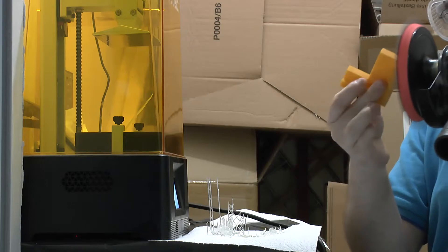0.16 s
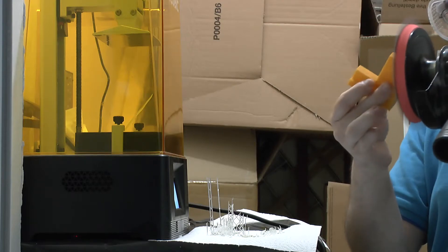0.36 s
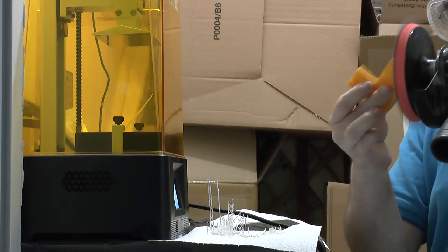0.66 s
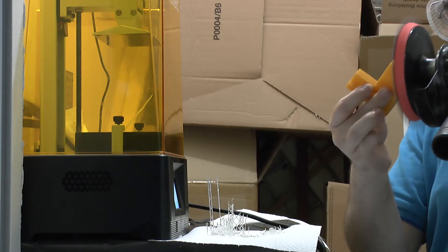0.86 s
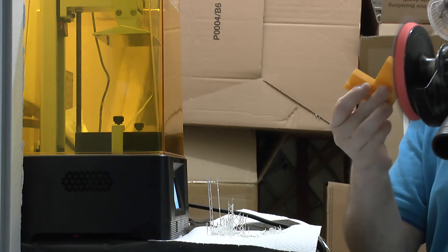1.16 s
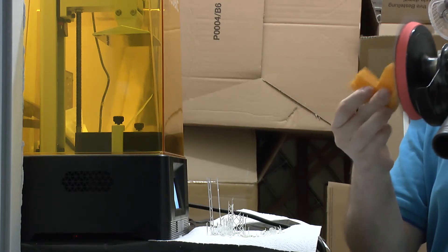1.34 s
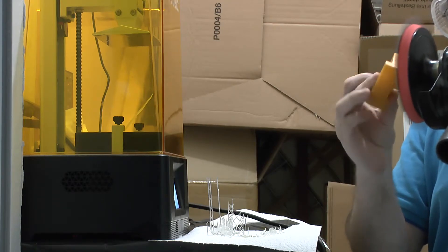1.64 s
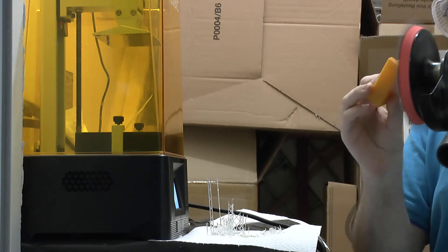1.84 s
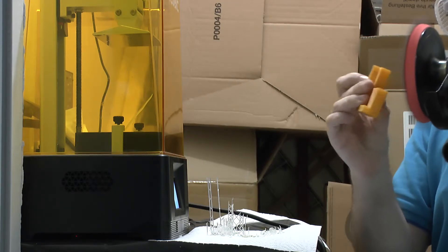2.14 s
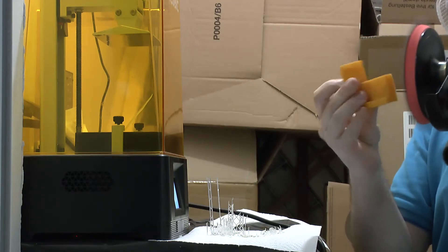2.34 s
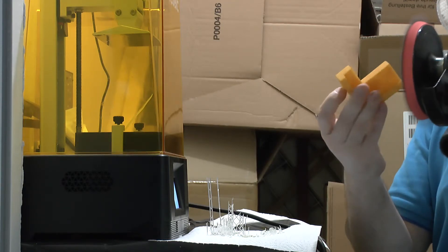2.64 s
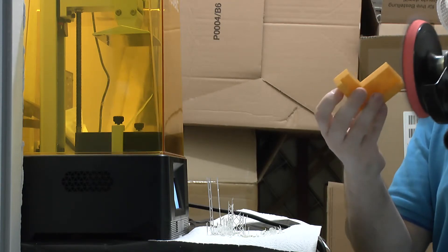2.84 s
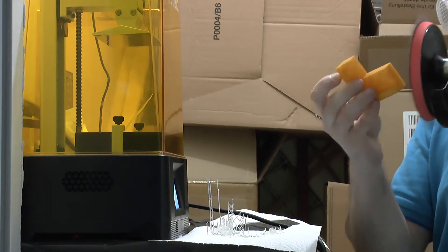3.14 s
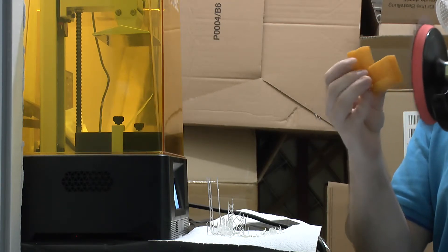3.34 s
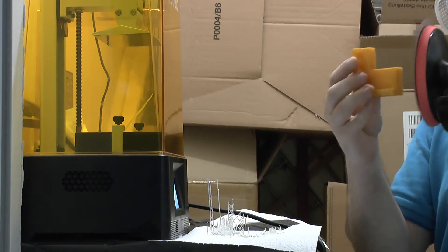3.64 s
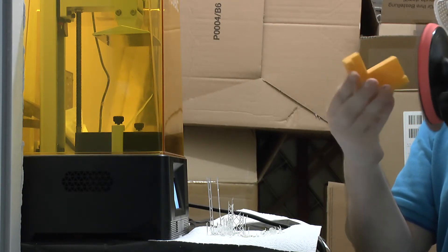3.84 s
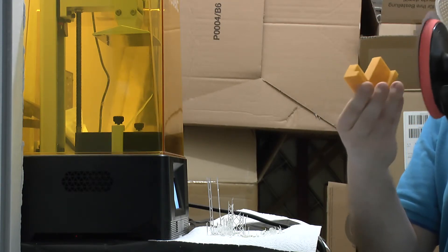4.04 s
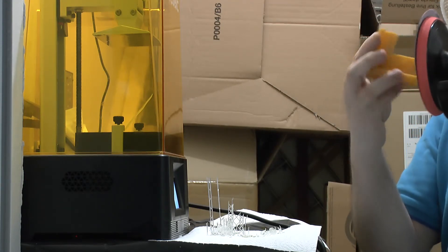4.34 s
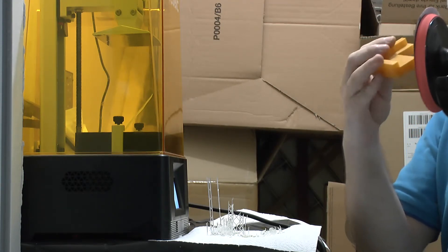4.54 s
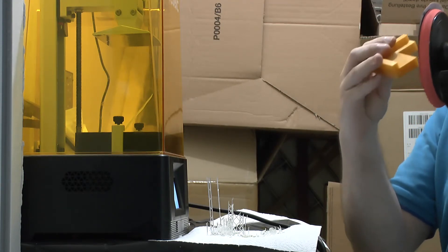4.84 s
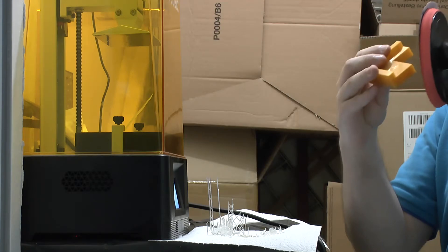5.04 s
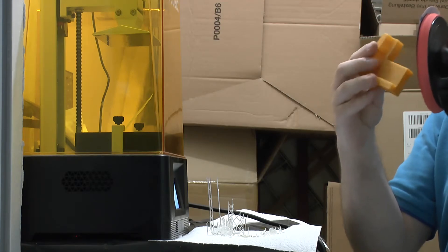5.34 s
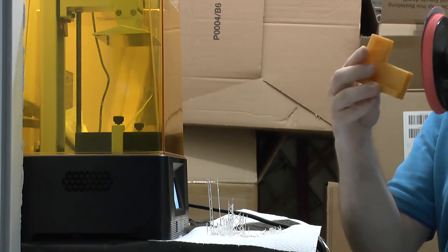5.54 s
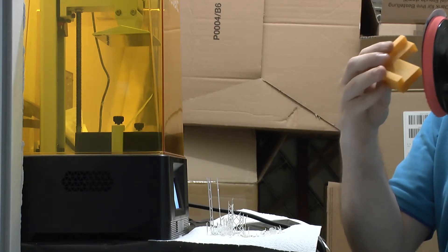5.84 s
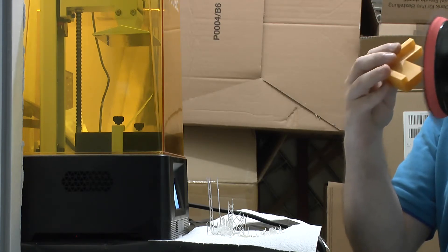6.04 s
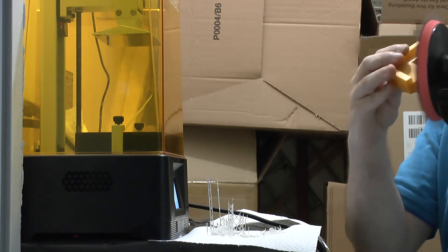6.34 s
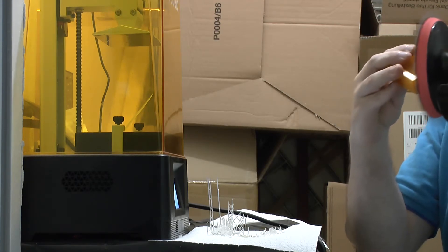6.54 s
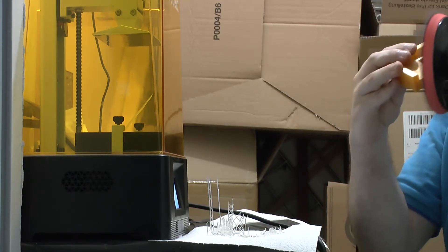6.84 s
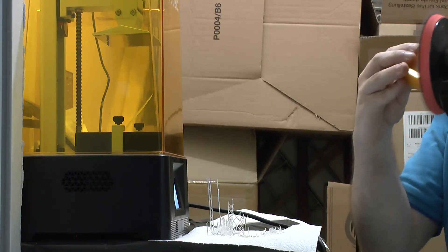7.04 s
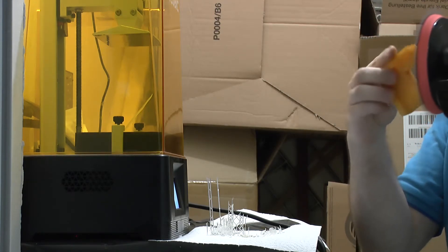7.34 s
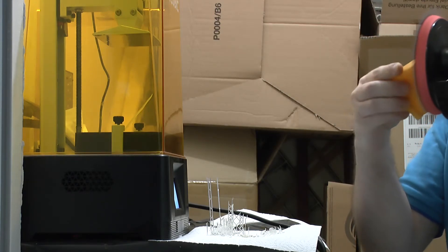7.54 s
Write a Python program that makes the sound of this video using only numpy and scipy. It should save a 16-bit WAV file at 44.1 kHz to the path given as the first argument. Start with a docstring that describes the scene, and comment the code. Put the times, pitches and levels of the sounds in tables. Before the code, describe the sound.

Close harsh motor whir with brief gritty rubs, a clattering coast-down to near silence, a lock snap, then a sudden rattling restart in a workshop.

```python
"""In a small workshop a mains grinder with a sanding pad runs close by; a plastic part brushes the pad.
Loose gears rattle in the resonant housing over noise (whirr) and armature harmonics (whine) of the motor.
It is switched off, coasts with ever sparser knocks and a snap, creeps to rest with faint friction; a lock snaps.
After a silence the switch clicks and it jerks up to speed. Resonators driven by noise, clicks and tones
make the whirr, rattle, knocks and snaps; sines make the hum, buzz, rotation tones and squeaks."""
import sys
import numpy as np
from scipy import signal
from scipy.io import wavfile

SR = 44100
rng = np.random.default_rng(int(sys.argv[2]) if len(sys.argv) > 2 else 0)


def log_audio(samples):
    """Write samples as a 16-bit WAV file to the path given in sys.argv[1]."""
    # one column per channel
    frames = np.atleast_2d(samples).T
    # limit to full scale, then quantise
    limited = np.clip(frames, -1, 1)
    pcm = np.round(limited * 32767).astype(np.int16)
    wavfile.write(sys.argv[1], SR, pcm)


N = 338688
T = np.arange(N) / SR
POWER_OFF_S, POWER_ON_S = 2.63, 5.914
GEAR_RATIO = 3.27      # armature turns for one turn of the pad
MAINS_BEAT_HZ = 100    # current peaks per second
CUTOFF_HZ = 16600      # upper limit of the sound


def from_db(db):
    """Level law: amplitude is ten to the power of dB / 20."""
    return 10 ** (np.asarray(db) / 20)


def rms_one(x):
    """Normalization: divides by the root mean square."""
    return x / np.sqrt(np.mean(x ** 2) + 1e-20)


def in_time(rows, outside=-150):
    """Linear interpolation: columns become straight lines in time, with `outside` beyond the table."""
    s, *columns = np.transpose(rows)
    return np.array([np.interp(T, s, c, left=outside, right=outside) for c in columns])


def drift(rate):
    """Low-pass random process: slow chance of spread 1, with its corner at rate in Hz."""
    r = np.exp(-2 * np.pi * rate / SR)
    slow = signal.lfilter([1], [1, -2 * r, r * r], rng.standard_normal(N + 20000))
    return rms_one(slow[20000:])


def resonances(x, modes):
    """Modal superposition: parallel (Hz, width in Hz, dB) resonances with alternating signs."""
    out = 0
    for k, (hz, width_hz, level_db) in enumerate(modes):
        r = np.exp(-np.pi * width_hz / SR)
        poles = [1, -2 * r * np.cos(2 * np.pi * hz / SR), r * r]
        zeros = [(1 - r * r) / 2, 0, (r * r - 1) / 2]
        out = out + (-1) ** k * from_db(level_db) * signal.lfilter(zeros, poles, x)
    return out


def dying(clicks, t60, rise=0.00071):
    """Exponential decay: each click starts an envelope that swells briefly and dies away (seconds)."""
    r = np.exp(-1 / (rise * SR))
    decay = signal.lfilter([1], [1, -from_db(-60 / (t60 * SR))], clicks + 1e-18)
    return signal.lfilter([1 - r], [1, -r], decay)


def once_a_cycle(phase):
    """Phase counting: marks the sample at which a jittery phase completes each cycle."""
    return np.diff(np.floor(np.maximum.accumulate(phase) / (2 * np.pi)), prepend=0) > 0


# Whirr of housing, gear case, and fan with brushes. Each row: level in dB at full speed,
# dB lost when power is cut, dB lost per halving of speed.
WHIRR = [(-19.5, 6, 8), (-21, 5, 6), (-30, -1, 9)]
# The whirr jerks, falters and catches. Each row: time in seconds, level in dB over running level.
START_UP = [(5.914, 1), (5.97, -2.5), (5.99, 1), (6.008, -3.5), (6.05, -5.5), (6.076, 2), (6.16, 3.5),
            (6.3, 3)]


def whirr_db(speed):
    """Speed law of noise: steady under power, sinking with each halving of speed while coasting."""
    halvings = np.log2(150 / np.clip(speed, .01, 150))
    start_db = np.interp(T, *np.transpose(START_UP)) * (T > POWER_ON_S)
    coasting = (T >= POWER_OFF_S) & (T <= POWER_ON_S)
    return np.array([full_db + start_db - coasting * (cut_db + halving_db * halvings)
                     for full_db, cut_db, halving_db in WHIRR])


def rattle(turns, powered):
    """Backlash: teeth knock at each current peak and about once a turn, harder at one angle of the pad."""
    by_current = powered * once_a_cycle(2 * np.pi * MAINS_BEAT_HZ * T + 1.1 * drift(40))
    by_turn = once_a_cycle(turns + .9 * drift(60))
    pad_db = 2.5 * np.cos(turns / GEAR_RATIO + 1.4 * drift(6.5))
    sizes = from_db(pad_db + np.clip(rng.normal(0, 2.5, N), -9, 4))
    return rms_one(dying((by_current + .4 * by_turn) * sizes, t60=.011, rise=.001))


# Harmonics of the bar rate. Each row: multiple of the bar rate, relative level in dB under power,
# relative level in dB coasting.
BAR_TONES = [(1, -3, 0), (2, -2, 1), (3, 4, -1), (4, 3, -2), (5, 0, -2), (6, 0, -3), (7, -2, -3),
             (8, -3, -4), (9, -5, -5), (10, -6, -6)]
BARS = 24
COASTING_FLICKER_DB = 2   # spread of the flicker with the power off


def commutator_whine(speed, turns, powered, surge):
    """Harmonic series: brushes tick over the bars; uneven bars add side lines one order apart."""
    uneven = 1 + 0.4 * np.cos(turns + 3 * drift(7.0))
    waver = turns + 0.0067 * drift(46)
    tones = 0
    for multiple, tone_db, coasting_db in BAR_TONES:
        level_db = np.where(powered, tone_db, coasting_db + 3.1 * drift(12)) + 1.6 * drift(2.7)
        audible = multiple * BARS * speed < CUTOFF_HZ
        tones = tones + from_db(level_db) * np.cos(round(multiple) * BARS * waver) * audible
    fade = np.clip(speed / 48, 0, 1) ** 2 * (1 - surge) ** 4
    return uneven * tones * fade * from_db(COASTING_FLICKER_DB * drift(30) * ~powered)


# Steady orders of the armature. Each row: multiple of the turning rate, level in dB under power at full speed.
ORDERS = [(1, -48), (2, -44), (8, -71.5), (11, -30.5), (12, -29), (14, -33.5), (16, -36), (28, -52.5),
          (32, -56)]
COASTING_ORDERS_DB = -6   # the orders weaken once the field is off
PAD_DB = -38              # the wobble of the pad is a low tone


def rotation_tones(speed, turns, powered):
    """Unbalance: forces locked to the rotation grow steeply with speed."""
    fast = np.sqrt(2) * (speed / 150) ** 2.1
    out = 0
    for multiple, level_db in ORDERS:
        level_db = level_db + COASTING_ORDERS_DB * ~powered + 2.1 * drift(29)
        out = out + fast * from_db(level_db) * np.sin(round(multiple) * turns + 1.0 * drift(7.7))
    return out + fast * (speed / 150) ** 2.5 * from_db(PAD_DB) * np.sin(turns / GEAR_RATIO)


# Buzz of the windings. Each row: multiple of the current beat, level in dB at full speed.
BUZZ_LINES = [(1, -57), (2, -53.5), (3, -51.5), (5, -45)]
SURGE_DB = 7   # rise of the buzz at full starting current


def winding_buzz(powered, surge):
    """Magnetic excitation: harmonics of the current beat, louder with the starting current."""
    out = 0
    for multiple, level_db in BUZZ_LINES:
        level = powered * from_db(level_db + SURGE_DB * surge + 2.6 * drift(24))
        out = out + np.sqrt(2) * level * np.sin(2 * np.pi * round(multiple) * MAINS_BEAT_HZ * T)
    return out


# Armature speed. Each row: time in seconds, speed in turns per second.
SPEED = [(0, 150.2), (2.63, 150.2), (2.82, 131), (2.98, 114), (3.14, 98), (3.38, 75.5), (3.54, 61.5),
         (3.7, 49.5), (3.9, 37), (4.2, 20), (4.4, 8), (4.45, .01), (5.91, .01), (6.05, 70), (6.2, 130),
         (6.3, 150.8), (7.68, 150.2)]
# Modes of the housing, of the gear case, and of the vents and guard, then the hollow body of the knocks,
# fuller when slow. Each row: frequency in Hz, width in Hz, relative level in dB.
HOUSING = [(334, 380, -13), (622.6, 137, 0.5), (898.4, 290, -8), (1212, 180, -6), (1740, 113, 6),
           (2054, 300, 2.5), (2582, 410, -9)]
GEAR_CASE = [(3200, 322, -1.5), (3690, 160, -1), (4230, 180, -1), (4717, 220, -1.5), (5224, 199, 1.5),
             (5970, 210, -3)]
TREBLE = [(6970, 1100, 2), (9140, 650, 4), (10050, 3200, -5.5), (13170, 1500, -10), (14300, 1300, -15)]
KNOCK_BODY = [(584, 110, -10), (877, 169, -4)]
# Slow knocks reach housing, gear case and vents less: dB per halving of speed.
KNOCK_DULLING_DB = (0.5, 2.5, 5)
RATTLE_DB, COASTING_RATTLE_DB = 8, 2    # random rattle over the whirr, with power on and off
COASTING_WHINE_DB = (2, 2, -1)          # change of the whine with the power off; same three parts
GROWL_DB = -12.5                        # growl of the housing with the starting current
BODY_DB, BODY_HALVING_DB = 14, 1.5      # slow knocks have more body: dB, dB gained per halving of speed
KNOCK_COLOUR_DB = 1.8                   # each knock favours another part of the casing
KNOCK_T60_S = .025


def motor():
    """Forced vibration: whirr, rattle, knocks and commutator whine sound through the same housing."""
    speed, = in_time(SPEED)
    turns = 2 * np.pi * np.cumsum(speed) / SR   # angle in radians
    powered = (T < POWER_OFF_S) | (T > POWER_ON_S)
    mains = powered * np.cos(2 * np.pi * MAINS_BEAT_HZ * T)
    surge = powered * np.clip(1 - speed / 150, 0, 1)   # a slow armature draws a heavy current
    halvings = np.log2(150 / np.clip(speed, 8, 150))
    levels_db = whirr_db(speed)
    rattle_db = np.where(powered, RATTLE_DB, COASTING_RATTLE_DB)
    white = rng.standard_normal(N)
    chatter = rattle(turns, powered)
    whine = commutator_whine(speed, turns, powered, surge)

    knock_shapes = dying(knock_clicks(speed, turns, powered), t60=KNOCK_T60_S, rise=0.00082)
    knocks = from_db(-5.0) * knock_shapes * rng.standard_normal(N)
    growl_db = GROWL_DB + 8.5 * mains + levels_db[0] - WHIRR[0][0]
    growl = from_db(growl_db) * np.sqrt(surge) * white
    full_knocks = knocks * from_db(BODY_HALVING_DB * halvings)
    out = resonances(full_knocks + growl, KNOCK_BODY) * from_db(BODY_DB)

    # shares of rattle, whine and knocks in housing, gear case and vents, in dB
    parts = zip((HOUSING, GEAR_CASE, TREBLE), levels_db, (2, 6, -4), (-12, -18, -13), (-1, -2, -20),
                COASTING_WHINE_DB, KNOCK_DULLING_DB)
    for modes, level_db, grip_db, whine_db, knock_db, coast_db, dull_db in parts:
        grip = from_db(rattle_db + grip_db)
        shake = white * (1 + grip * chatter) / (1 + grip)
        duller_db = -dull_db * halvings * ~powered + KNOCK_COLOUR_DB * drift(25)
        drive = from_db(level_db) * (shake + from_db(whine_db + coast_db * ~powered) * whine)
        drive += from_db(knock_db + duller_db) * knocks
        out += resonances(drive, modes) / resonances(white, modes).std()
    out += rotation_tones(speed, turns, powered) + winding_buzz(powered, surge)
    return out, turns


# The low hum wavers. Each row: time in seconds, level in dB.
HUM = [(3.0, -60), (3.5, -61), (3.76, -80), (3.95, -64), (4.57, -67), (4.66, -58), (5.13, -70), (5.25, -68),
       (5.67, -79.5), (6.15, -48.5)]
# Each row: frequency in Hz, relative level in dB.
HUM_LINES = [(30, 1), (50, 0.5)]
FLOOR_DB = -77


def background():
    """Tones over noise: two low hum lines over a faint low-pass rumble."""
    level_db, = in_time(HUM)
    hum = sum(from_db(line_db + 1.9 * drift(3.5)) * np.sin(2 * np.pi * hz * T) for hz, line_db in HUM_LINES)
    rumble = signal.lfilter([1], [1, -1.97, .9702], rng.standard_normal(N))
    return from_db(level_db) * hum + from_db(FLOOR_DB) * rms_one(rumble)


# The part brushing the pad. Each row: start in seconds, length in seconds, rise in seconds, level in dB.
TOUCHES = [(0.077, 0.011, 0.0045, -37), (0.427, 0.0044, .003, -14), (0.441, 0.012, 0.0069, -9.5),
           (0.671, 0.023, 0.0059, -11), (0.815, 0.0095, 0.0063, -6), (1.347, 0.041, 0.015, -19.5),
           (1.98, 0.027, 0.004, -10.5), (6.617, 0.062, 0.0018, -13.5), (7.008, 0.061, .002, -12.5),
           (7.086, 0.023, 0.0056, -14)]
# Modes of the grit hiss. Each row: frequency in Hz, width in Hz, relative level in dB.
GRIT = [(4200, 7100, -6), (6730, 1700, 2), (9000, 1200, -7), (12000, 2500, -7.5), (14500, 4300, -20.5)]


def sanding(turns):
    """Amplitude-modulated friction noise: bright grit hiss throbs twice for each turn of the pad."""
    press = 0
    for s, length, rise, level_db in TOUCHES:
        release = np.exp(-np.clip(T - s - length, 0, 1) / 0.0025)
        press = press + from_db(level_db) * np.clip((T - s) / rise, 0, 1) * release
    throb = from_db(3.5 * np.cos(2 * turns / GEAR_RATIO) + 2.5 * drift(120))
    return press * rms_one(resonances(throb * rng.standard_normal(N), GRIT))


# Single knocks late in the coast-down and at switch-on. Each row: time in seconds, relative strength in dB.
KNOCKS = [(3.407, -12), (3.454, -11.5), (3.48, -10.5), (3.607, -22), (3.624, -15), (3.639, -12),
          (3.688, -9.5), (3.714, -16), (3.737, -17), (3.779, -17), (3.801, -11.5), (3.816, -11.5),
          (3.848, -13), (3.9, -25), (3.913, -20), (3.934, -18), (3.991, -16.5), (4.105, -19.5),
          (4.126, -25), (4.148, -23), (4.164, -25), (4.18, -19), (4.211, -22), (4.247, -26.5),
          (4.274, -26.5), (4.301, -30.5), (4.334, -27.5), (4.349, -28), (4.366, -34.5), (4.406, -41),
          (5.914, -4.5), (5.924, -8), (5.935, -0.5), (5.945, -8), (5.964, -1), (5.983, -2.5), (6.104, -40)]
# Coasting gears slam once for each turn of the pad, and now and then between:
# angle in turns, relative strength in dB at full speed, dB lost per halving of speed, spread in dB.
SLAM_ANGLE, SLAM_DB, SLAM_HALVING_DB, SLAM_SPREAD_DB = .48, -4, 7, 1.5
SLAM_ENDS_TURNS_PER_S = 56   # slower than this the teeth lose step
STRAYS_PER_S, STRAY_DB, STRAYS_END_TURNS_PER_S = 70, -9, 45   # STRAY_DB is relative to a slam


def knock_clicks(speed, turns, powered):
    """Impact excitation: slams in step with the pad, stray ones between, and single knocks."""
    pad_phase = turns / GEAR_RATIO - 2 * np.pi * SLAM_ANGLE + .25 * drift(30)
    in_step = once_a_cycle(pad_phase) * (speed > SLAM_ENDS_TURNS_PER_S)
    strays = (rng.random(N) < STRAYS_PER_S / SR) * from_db(STRAY_DB) * (speed > STRAYS_END_TURNS_PER_S)
    size_db = SLAM_DB - SLAM_HALVING_DB * np.log2(150 / speed) + SLAM_SPREAD_DB * rng.standard_normal(N)
    clicks = ~powered * (in_step + strays) * from_db(size_db)
    for s, strength_db in KNOCKS:
        clicks[round(s * SR)] = from_db(strength_db)
    return clicks


# Plastic snaps: one during the coast, then of lock and switch. Each row: time in seconds,
# relative strength in dB, brightness in dB per octave about 2 kHz.
SNAPS = [(3.229, -10.5, -3), (4.938, -51, -9), (4.9734, -19, -6.5), (4.9771, -14.5, 1.5), (5.8584, -30, -1),
         (5.8614, -50.5, 17)]
# Modes of the casing. Each row: frequency in Hz, width in Hz, relative level in dB.
CASING = [(280, 220, -26.5), (913, 86, 5.5), (1640, 152, 5.5), (1820, 320, 1.5), (3370, 770, -3),
          (4200, 610, 0.5), (4960, 400, 4), (7700, 1800, -14.5), (11800, 1000, -18.5)]


def snaps():
    """Impulse response: each snap is a click with a short noisy aftermath, coloured by the casing."""
    out = np.zeros(N)
    at = [round(row[0] * SR) for row in SNAPS]
    _, strength_db, brightness_db = np.transpose(SNAPS)
    white = rng.standard_normal(N)
    for k, mode in enumerate(CASING):
        clicks = np.zeros(N)
        clicks[at] = from_db(strength_db + brightness_db * np.log2(mode[0] / 2000))
        drive = from_db(29.5) * clicks
        drive += white * from_db(3) * dying(clicks, t60=0.033, rise=0.00037)
        drive += white * from_db(-32.0) * dying(clicks, t60=0.032)
        out += (-1) ** k * resonances(drive, [mode])
    return out


# Faint scrape near rest. Each row: time in seconds, dull part in dB, thin part in dB.
SCRAPE = [(4.4, -56.5, -69), (4.486, -64, -67), (4.596, -68, -65), (4.64, -65.5, -64), (4.75, -59, -60),
          (4.926, -59.5, -66), (4.942, -55, -75), (4.955, -63, -58)]
# Modes of the two parts. Each row: frequency in Hz, width in Hz, relative level in dB for one pass.
SCRAPE_DULL = [(417, 290, -2), (1520, 350, -3), (2020, 320, 0), (2770, 330, -3), (3420, 320, -5.5)]
SCRAPE_THIN = [(4500, 360, -1), (5100, 390, 0), (6100, 480, -3.5), (7300, 410, -6.5)]


def scrape():
    """Friction: soft uneven noise passes twice through each of two groups of resonances."""
    grain = from_db(1.2 * drift(40)) * rng.standard_normal(N)
    parts = [rms_one(resonances(resonances(grain, modes), modes)) for modes in (SCRAPE_DULL, SCRAPE_THIN)]
    return np.sum(from_db(in_time(SCRAPE)) * parts, axis=0)


# Bearing near rest. Each row: start in seconds, length in seconds, top frequency in Hz, level in dB.
SQUEAKS = [(4.406, 0.036, 2480, -58), (4.496, 0.12, 2510, -60)]
SQUEAK_ATTACK_S, SQUEAK_RELEASE_S, SQUEAK_TOP_S = .015, 0.011, .038
SQUEAK_CLIMB_HZ_PER_S, SQUEAK_SAG_HZ_PER_S, SQUEAK_WAVER_HZ = 4000, 1600, 25


def squeak():
    """Frequency modulation: thin bearing tones climb quickly and sag."""
    out = 0
    for s, length, top_hz, level_db in SQUEAKS:
        past_top = T - s - SQUEAK_TOP_S
        slope = np.where(past_top < 0, -SQUEAK_CLIMB_HZ_PER_S, SQUEAK_SAG_HZ_PER_S)
        hz = top_hz - slope * np.clip(past_top, -.1, .3) + SQUEAK_WAVER_HZ * drift(30)
        attack = np.clip((T - s) / SQUEAK_ATTACK_S, 0, 1) ** 2
        release = np.exp(-np.clip(T - s - length, 0, 1) / SQUEAK_RELEASE_S)
        out = out + from_db(level_db) * attack * release * np.sin(2 * np.pi * np.cumsum(hz) / SR)
    return np.sqrt(2) * from_db(1.5 * drift(23)) * out


SHOP_T60_S, SHOP_DB = 0.2, -15.5


def shop(x):
    """Reverberation: convolution with dull noise that dies away exponentially."""
    t = np.arange(SR // 2) / SR
    tail = rng.standard_normal(len(t)) * from_db(-60 * t / SHOP_T60_S) * (t > .004)
    tail = signal.lfilter([1], [1, -.8], tail)
    return signal.fftconvolve(x, tail / np.sqrt(np.sum(tail ** 2)))[:N]


def scene():
    """Superposition: the tool, its reverberation and the background add."""
    running, turns = motor()
    tool = running + sanding(turns) + snaps() + scrape() + squeak()
    return (tool + from_db(SHOP_DB) * shop(tool) + background())[None]


GAIN_THRESHOLD_DB, GAIN_WINDOW_S, GAIN_ATTACK_S, GAIN_RECOVERY_DB_PER_S = -14, 0.034, .012, 7.5


def gain_control(x):
    """Dynamic compression: loud moments pull the gain down; it creeps back at a steady rate."""
    size = round(GAIN_WINDOW_S * SR)
    power = signal.lfilter([1], [1, -1], x ** 2 - np.pad(x ** 2, (size, 0))[:N]) / size   # moving mean
    over_db = np.clip(10 * np.log10(np.abs(power) + 1e-12) - GAIN_THRESHOLD_DB, 0, 30)
    recovery_db = GAIN_RECOVERY_DB_PER_S * T
    held_db = np.maximum.accumulate(over_db + recovery_db) - recovery_db
    r = np.exp(-1 / (GAIN_ATTACK_S * SR))
    return x * from_db(-signal.lfilter([1 - r], [1, -r], held_db))


def record(dry):
    """Saturation and band limiting: after gain control the peaks are rounded and the top is cut."""
    evened = gain_control(dry[0])[None]
    rounded = .9 * np.tanh(evened / .9)
    return signal.sosfilt(signal.cheby2(16, 80, CUTOFF_HZ, fs=SR, output="sos"), rounded)


dry = scene()
out = record(dry)
log_audio(out)
```